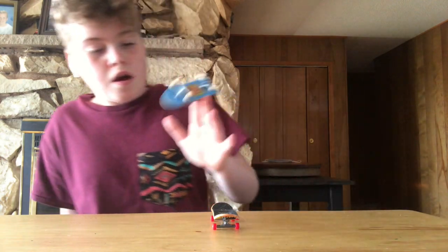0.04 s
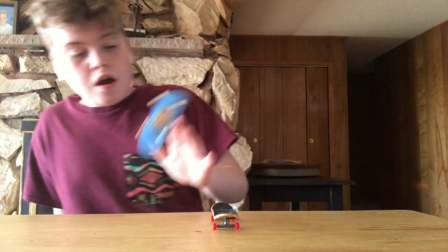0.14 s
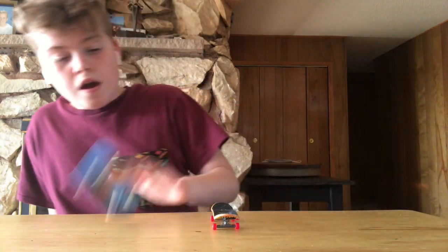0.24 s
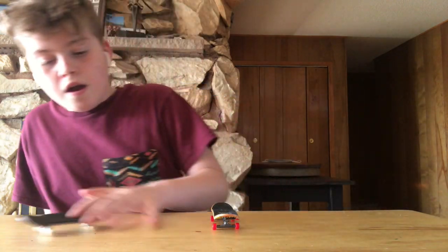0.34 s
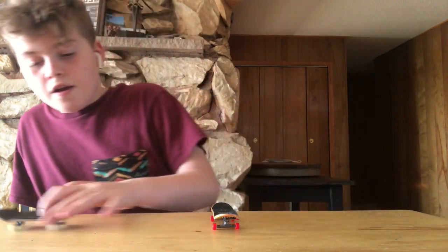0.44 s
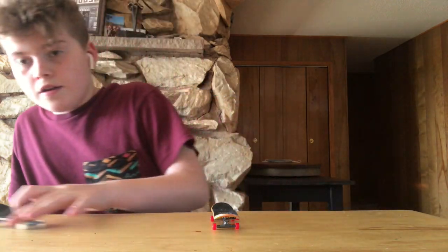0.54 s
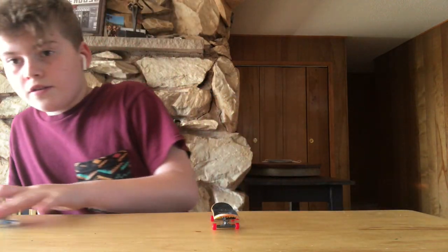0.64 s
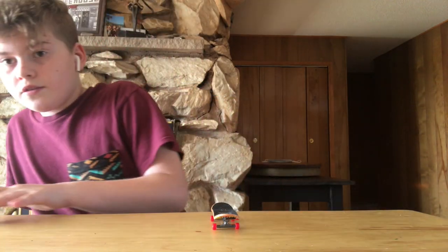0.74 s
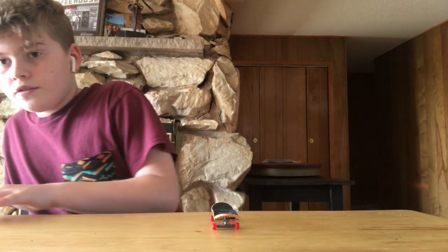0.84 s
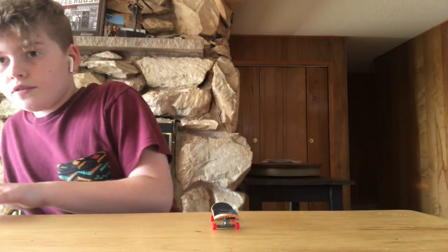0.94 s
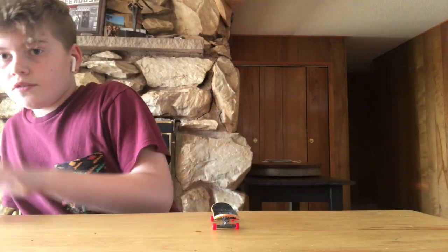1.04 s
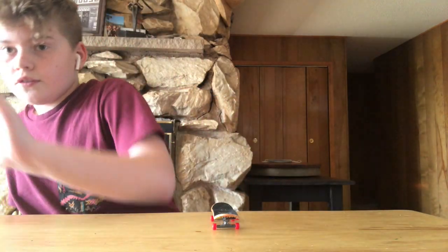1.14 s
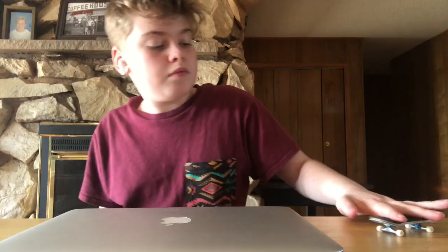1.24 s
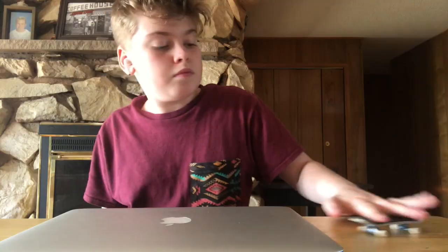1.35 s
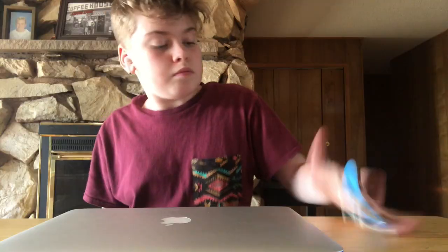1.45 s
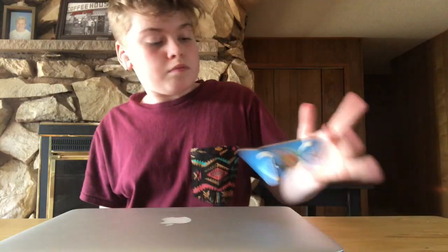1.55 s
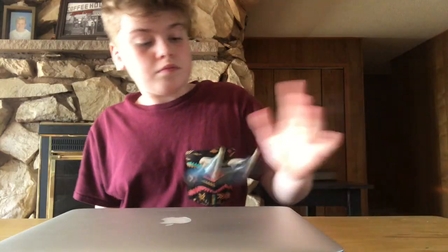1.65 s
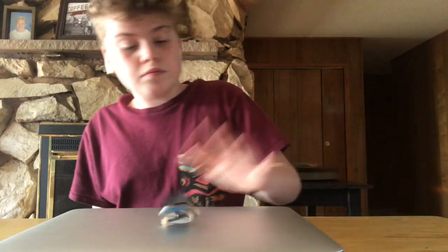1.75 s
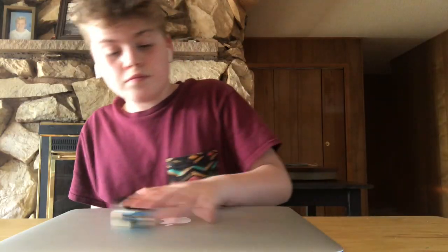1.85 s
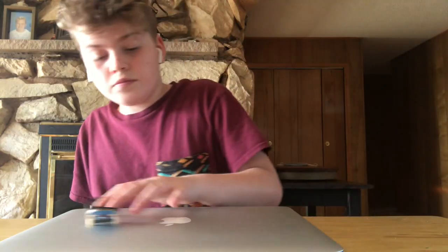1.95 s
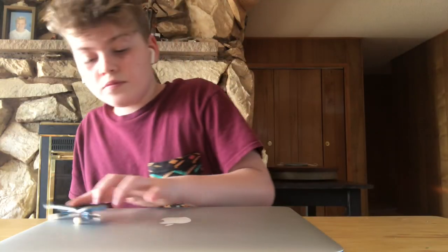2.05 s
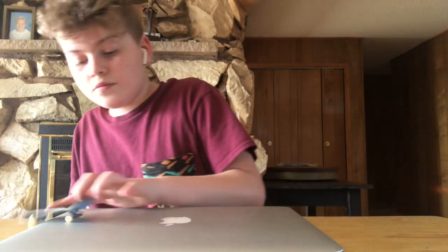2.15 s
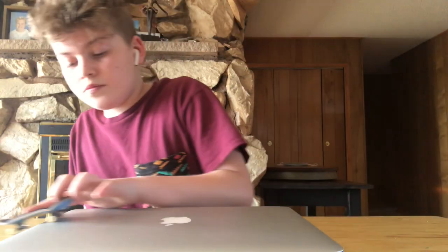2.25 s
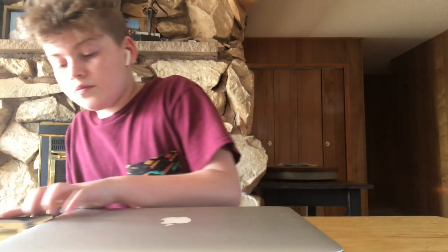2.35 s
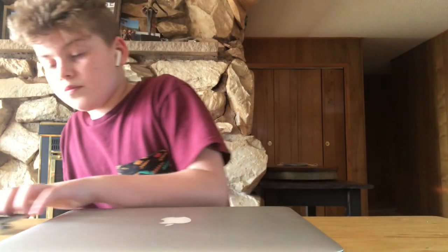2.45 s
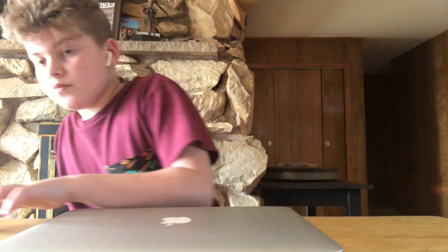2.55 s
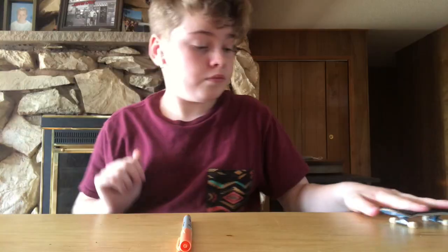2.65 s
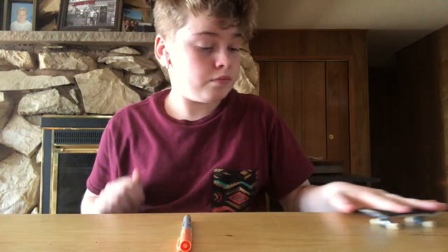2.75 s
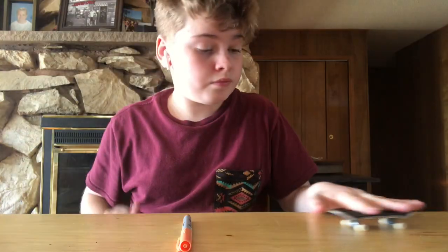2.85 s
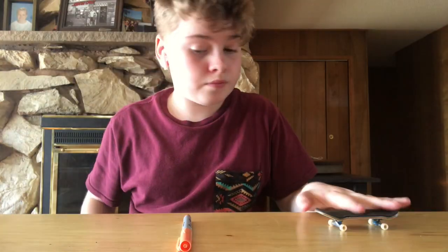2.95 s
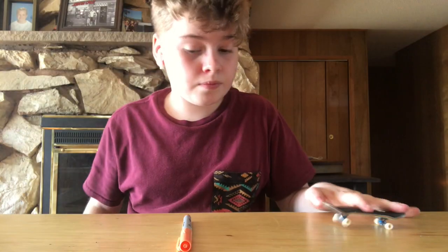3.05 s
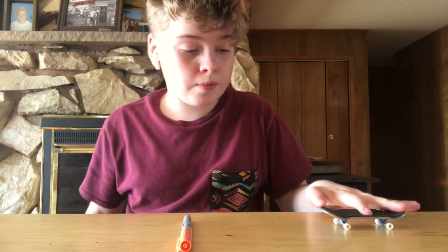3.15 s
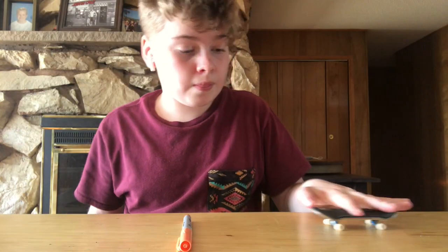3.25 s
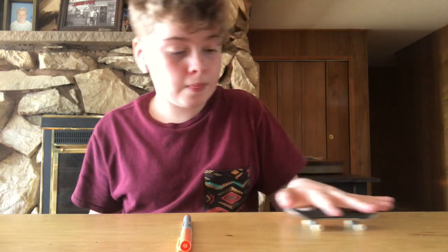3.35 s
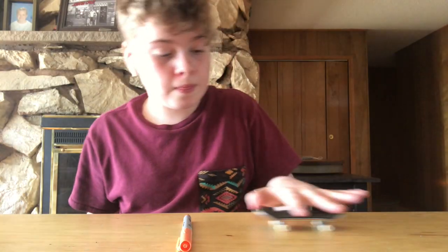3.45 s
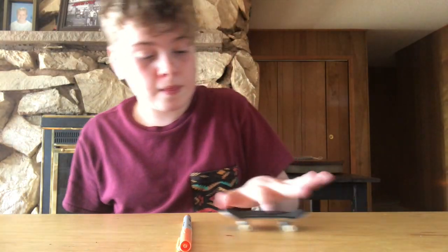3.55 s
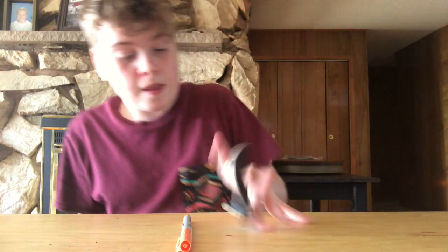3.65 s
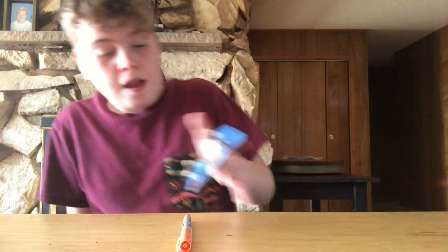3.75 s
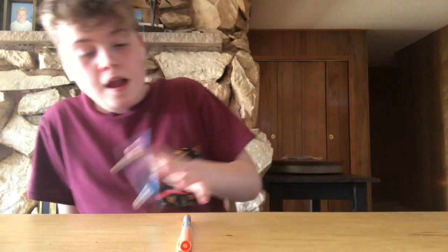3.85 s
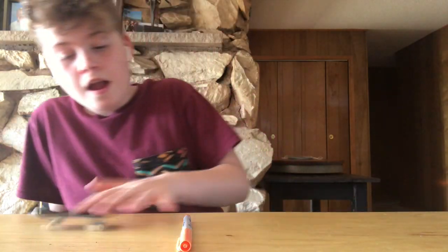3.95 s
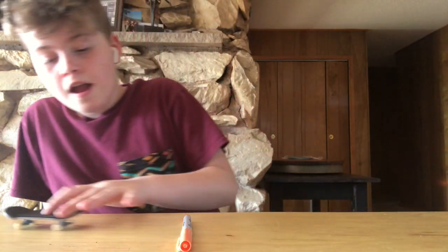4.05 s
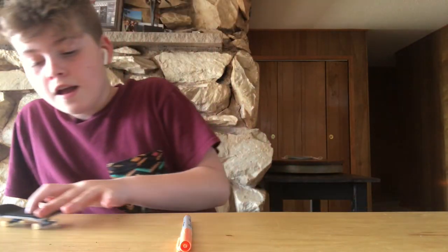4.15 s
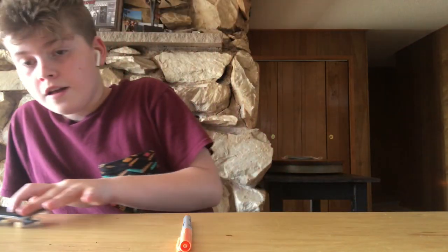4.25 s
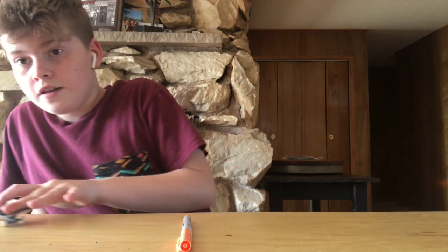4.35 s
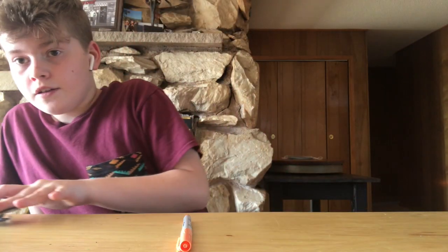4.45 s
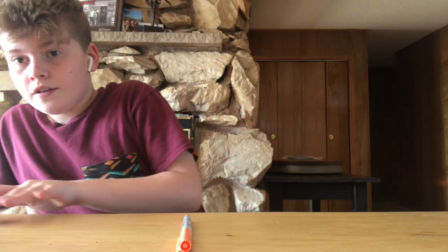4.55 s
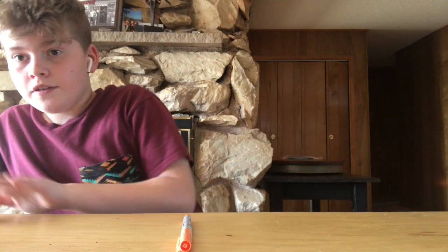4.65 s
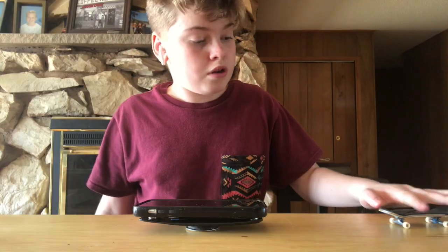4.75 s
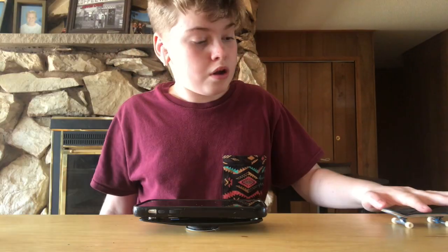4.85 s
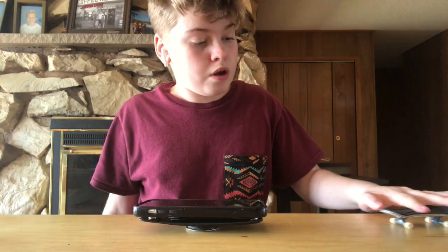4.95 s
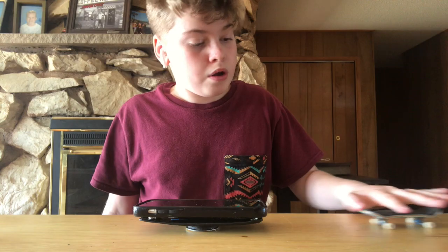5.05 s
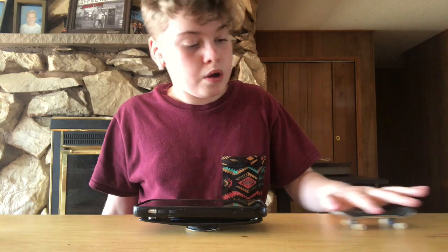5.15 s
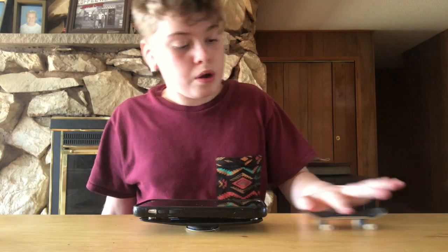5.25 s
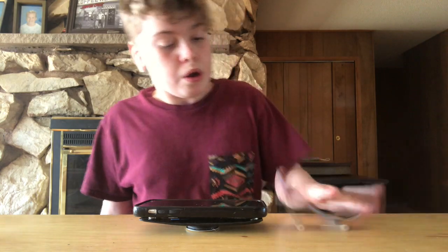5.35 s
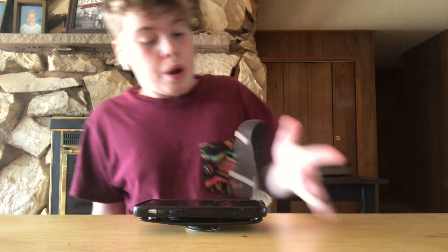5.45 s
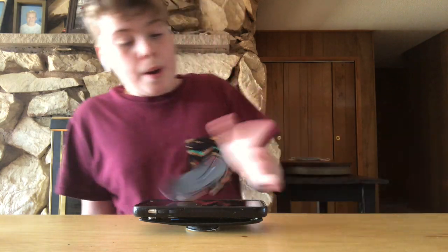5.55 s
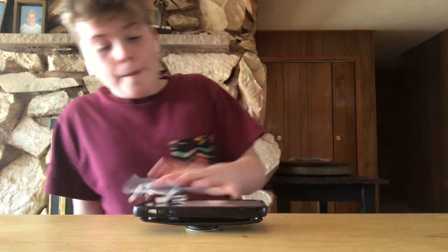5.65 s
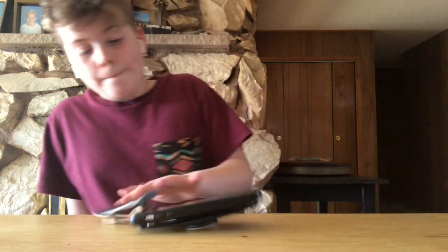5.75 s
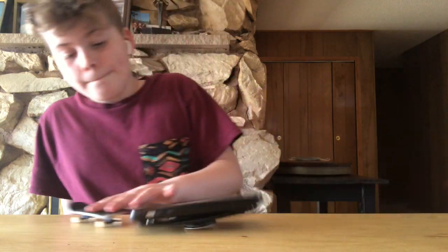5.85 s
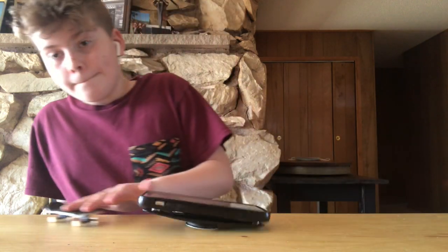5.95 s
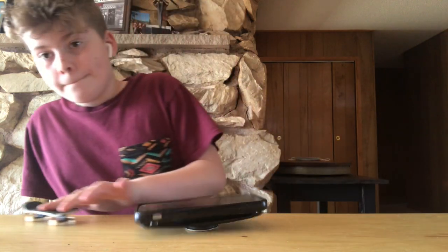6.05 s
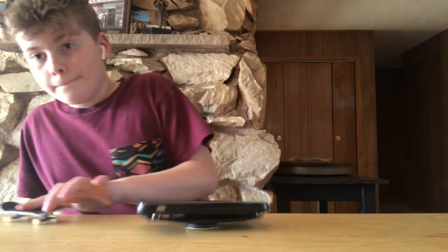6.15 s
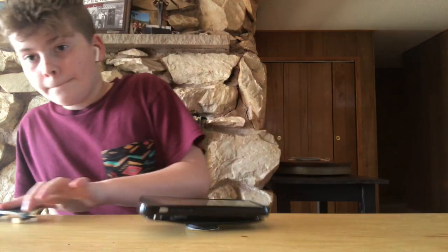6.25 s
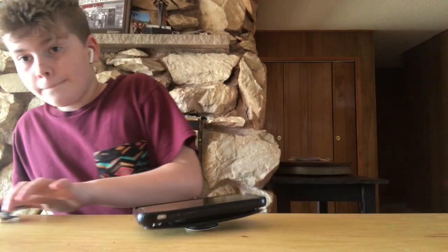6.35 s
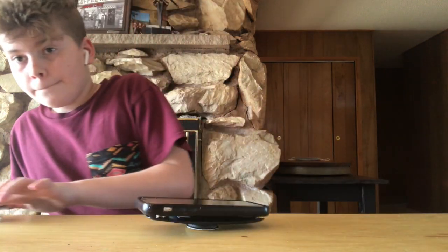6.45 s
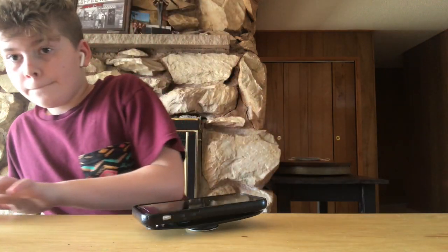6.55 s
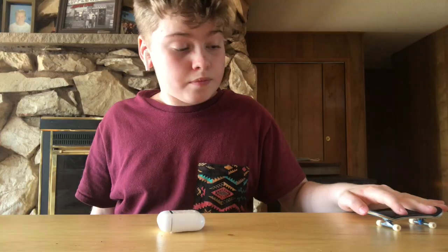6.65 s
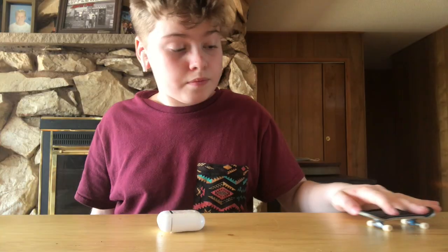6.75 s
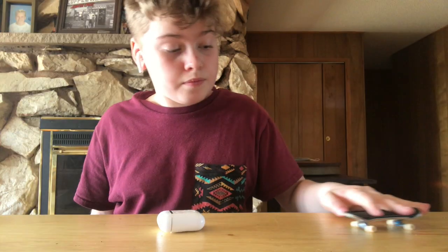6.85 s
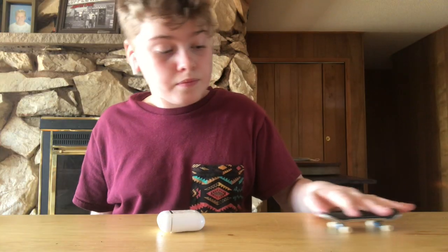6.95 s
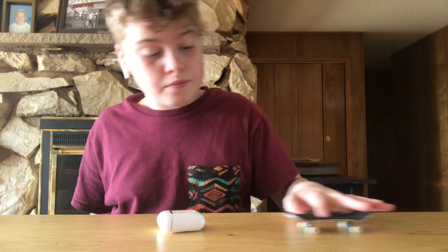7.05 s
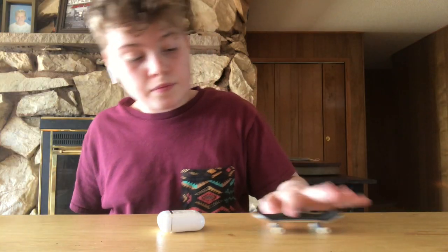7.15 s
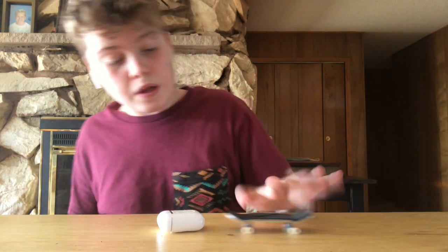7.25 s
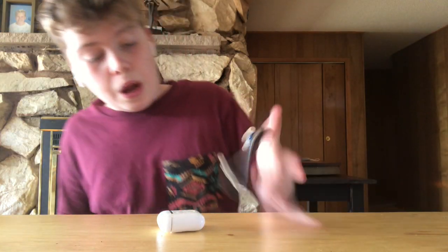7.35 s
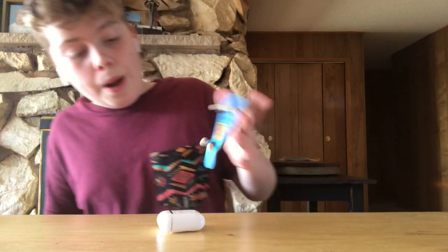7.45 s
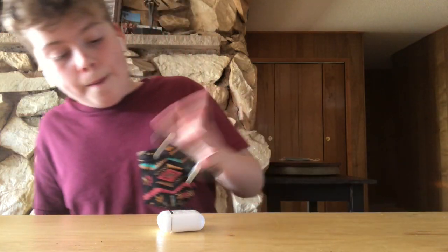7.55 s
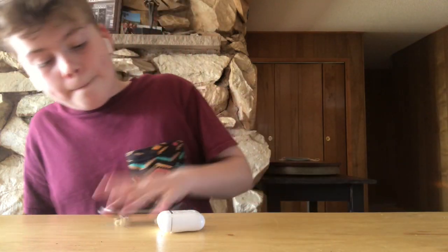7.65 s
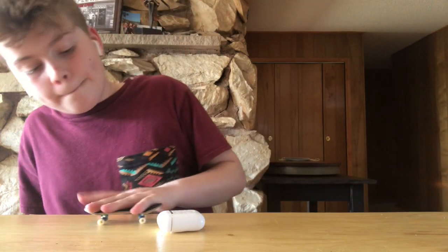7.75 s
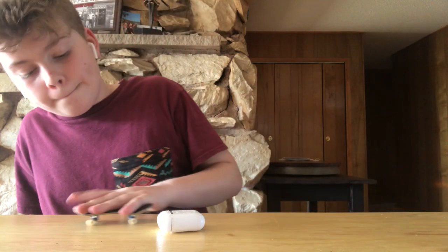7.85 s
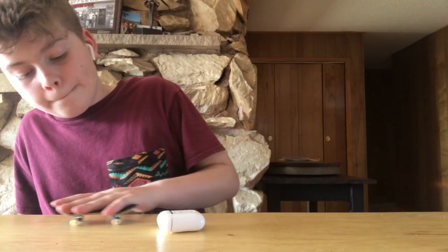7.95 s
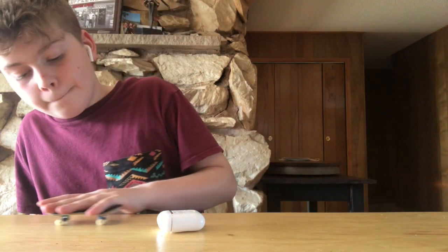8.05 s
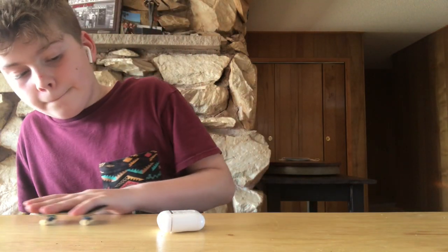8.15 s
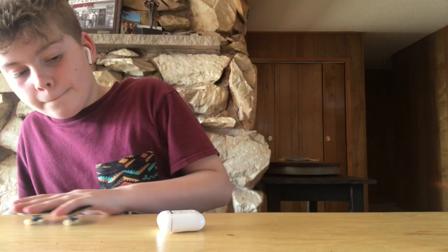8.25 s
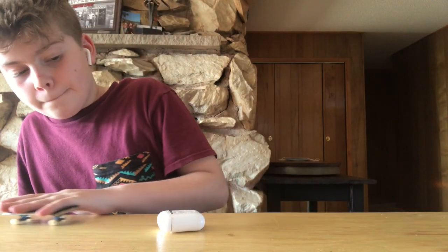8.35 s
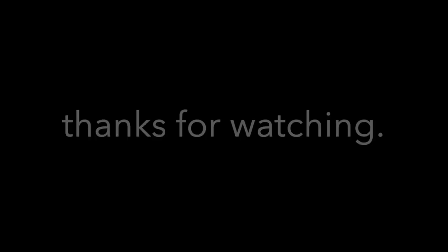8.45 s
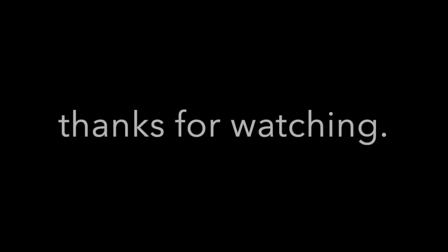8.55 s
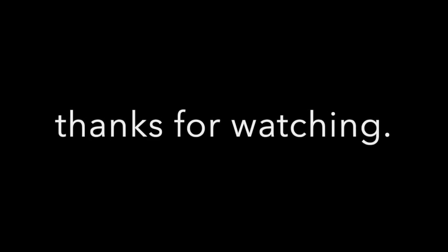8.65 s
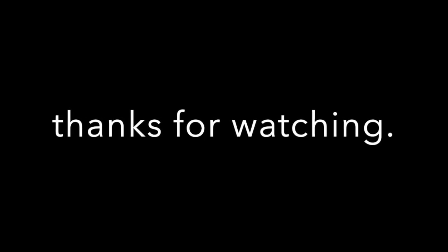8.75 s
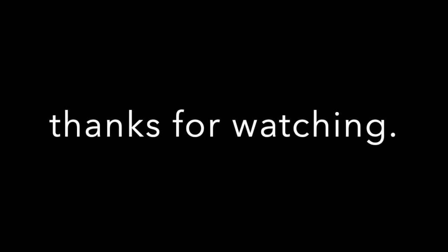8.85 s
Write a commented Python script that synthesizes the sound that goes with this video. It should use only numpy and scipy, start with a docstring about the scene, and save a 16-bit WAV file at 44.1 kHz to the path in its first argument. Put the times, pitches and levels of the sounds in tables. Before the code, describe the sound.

A miniature skateboard is rolled and flipped by fingers on a wooden table, heard from nearby with a short room echo. A faint, pulsing appliance hum and low rumble lie underneath, shifting slightly between five short takes. At about 0.3 seconds the board lands with a loud double clack and rolls away with a soft, grainy whirr. It pops at 1.4, clatters down around 1.7 to 1.8, then rolls on with clicks at 2.2 and 2.3. Light rolling and ticks lead to a pop at 3.6 and a sharp landing at 3.9. After more rolling, a pop at 5.4 is followed by a string of rattling knocks from 5.6 to 5.8 and a fading roll. The last trick snaps at 7.3 and lands loudly at 7.7, with the wheels rolling off quietly. Everything cuts to silence at about 8.4 seconds.

```python
"""A beating motor hum and low room rumble, then a miniature skateboard on a wooden table. Two fingers roll, pop
and land it over small obstacles: five short scenes, then silence. Rolling is noise from wood grain and grit.
Each contact is a few milliseconds of chatter that rings table, deck, wheels and trucks; the blows near 1.7-1.8
s and 5.56-5.66 s are a laptop lid and a phone being struck, voiced with the same sets of modes. Both echo in
the room."""
import sys
import numpy as np
from scipy import signal
from scipy.fft import rfft, irfft
from scipy.io import wavfile

SR = 44100
rng = np.random.default_rng(int(sys.argv[2]) if len(sys.argv) > 2 else 0)


def log_audio(samples):
    """Write samples as a 16-bit WAV file to the path given in sys.argv[1]."""
    # one column per channel
    frames = np.atleast_2d(samples).T
    # limit to full scale, then quantise
    limited = np.clip(frames, -1, 1)
    pcm = np.round(limited * 32767).astype(np.int16)
    wavfile.write(sys.argv[1], SR, pcm)


N = 392483

# Scenes: start_s, hum_beat_minimum_s
SCENE_TIMES = [(0, .62), (1.248, 1.74), (2.654, 3.08), (4.789, 5.97), (6.625, 7.87)]


def amp(db):
    return 10 ** (np.asarray(db) / 20)


def unit_rms(x):
    return x / np.sqrt(np.mean(x ** 2) + 1e-20)


def curve_at(points, hz):
    """Interpolate (freq_hz, value) points over log frequency."""
    freq_hz, value = np.transpose(points)
    return np.interp(np.log(hz + 1), np.log(freq_hz + 1), value)


def shaped_noise(spectrum):
    """Unit-rms noise from (freq_hz, density_db) points."""
    gain = amp(curve_at(spectrum, np.fft.rfftfreq(N, 1 / SR)))
    return unit_rms(irfft(rfft(rng.standard_normal(N)) * gain, N))


def resonate(x, peaks):
    """Steep-skirted resonances, summed in power; unit-rms output."""
    freq_hz = np.fft.rfftfreq(N, 1 / SR)
    power = sum(amp(db) ** 2 / (1 + (2 * (freq_hz - hz) / width_hz) ** 4) for hz, width_hz, db in peaks)
    return unit_rms(irfft(rfft(x) * np.sqrt(power), N))


def wander(rate_hz):
    """Slow random curve, rms about 1."""
    steps = rng.standard_normal(1000)
    return np.interp(np.arange(N) / SR * rate_hz, np.arange(1000), steps) * np.sqrt(3 / 2)


def motor_hum():
    """Two appliance motors, close in pitch, beat against each other."""
    upper_hz, lower_hz = 60, 54.4
    # Motor partials: harmonic, level_db
    upper_partials = [(1, 0), (2, -10.5), (3, -15.5)]
    lower_partials = [(1, -8.5), (2, -14), (3, -15), (4, -19.5)]
    t = np.arange(N) / SR
    start_s, minimum_s = np.transpose(SCENE_TIMES)
    since_s = t - minimum_s[np.searchsorted(start_s, t, "right") - 1]
    upper = sum(amp(db) * np.sin(2 * np.pi * k * upper_hz * since_s) for k, db in upper_partials)
    lower = sum(amp(db) * np.sin(2 * np.pi * k * lower_hz * since_s) for k, db in lower_partials)
    return unit_rms(upper - lower)


def room_tone():
    """Hum over resonant low rumble and faint hiss."""
    # Layer gains: time_s, hum_db, rumble_db, hiss_db
    gains = [(0, -60.5, -68, -75), (1.25, -61, -67.5, -75), (1.26, -59.5, -63.5, -73.5),
             (2.649, -61.5, -68.5, -74), (2.66, -52.5, -58, -70), (3.3, -58, -60, -81.5),
             (3.7, -57.5, -67, -73.5), (4.78, -70.5, -64, -76), (4.8, -61, -66, -74.5),
             (6.62, -56.5, -67.5, -74), (6.64, -59, -65, -75.5), (8.45, -60.5, -70, -76.5)]
    # Rumble spectrum: freq_hz, density_db
    rumble_spectrum = [(39, -32), (66, -8.5), (108, -11), (188, -9.5), (328, -14.5), (400, -16),
                       (480, -33.5), (620, -70), (1060, -120)]
    # Rumble resonances: centre_hz, width_hz, level_db
    rumble_peaks = [(125, 15, -5), (165.3, 14, -6.5), (186.2, 2.8, -14), (235, 4.7, -14)]
    # Hiss spectrum: freq_hz, density_db
    hiss_spectrum = [(260, -26.5), (450, 1), (810, -1.5), (1090, -2.5), (1600, -7.5), (2830, -9),
                     (3660, -7.5), (12800, -17), (15500, -14.5), (16500, -25.5)]
    t = np.arange(N) / SR
    time_s, *gains_db = np.transpose(gains)
    rumble = shaped_noise(rumble_spectrum) + amp(-1) * resonate(rng.standard_normal(N), rumble_peaks)
    layers = motor_hum(), rumble, shaped_noise(hiss_spectrum)
    return sum(amp(np.interp(t, time_s, db)) * layer for db, layer in zip(gains_db, layers))


def rolling():
    """Wood grain and specks of grit shake deck, table, wheels and trucks."""
    # Rolling levels, one curve per scene, rel = against the deck:
    # time_s, deck_db, upper_deck_rel_db, table_rel_db, wheels_rel_db, trucks_rel_db
    curves = [
        [(0, -79, -8, -4, 3, -7), (0.25, -88, -6.5, 0, -1, -5.5), (0.33, -50.5, -2.5, -8.5, -4, -16),
         (0.56, -61, -4, -5, -5.5, -24), (0.73, -61.5, -4.5, -4.5, -11, -32), (0.97, -83, -1.5, 3, -1, -7.5),
         (1.245, -86.5, -3, -0.5, -3.5, -2)],
        [(1.258, -53.5, -10, -11, -4, -13.5), (1.39, -66, -1.5, 3, -3, -18.5),
         (1.55, -64, -11.5, -6.5, -9.5, -7), (1.69, -84, -2.5, -4, -1.5, -5.5), (1.82, -56.5, -6, -13, 1, -7.5),
         (1.99, -57.5, -5.5, -9, -9.5, -16.5), (2.15, -70, -2, 2, -7, -14), (2.2, -57, -7, -9, -7, -18),
         (2.255, -67, -18, -4, -12, -21), (2.31, -56.5, -3.5, -11, -11, -15), (2.42, -61.5, 0, -1.5, -6, -17),
         (2.648, -72.5, -1.5, 5, -6, -16)],
        [(2.66, -64.5, -2.5, 1.5, 3, -0.5), (2.75, -58, 0, 7, -7, -15), (2.775, -51.5, -5.5, -4.5, -5.5, -4.5),
         (2.84, -52.5, -5, -1, -9.5, -15), (2.96, -70.5, -5.5, -0.5, -7.5, -10.5), (3.1, -71, -5, 2, -3, -4.5),
         (3.14, -71, -3, -1.5, -1.5, 5), (3.24, -69.5, -2, 7.5, -4.5, -2.5), (3.35, -61, -6, 4, 0, -8),
         (3.39, -66, -2, -7, -16, -24), (3.44, -60.5, -3.5, -2, -6.5, -13), (3.58, -66, -3.5, -0.5, -1, -14),
         (3.74, -63.5, -14, -7, 0.5, -6.5), (3.88, -79, -14, -3, -1.5, -11.5),
         (3.97, -53.5, -1.5, -10, -5.5, -20), (4.24, -66, -4.5, -5, -9.5, -20.5),
         (4.48, -83.5, -0.5, 11.5, -13, -11), (4.59, -73, -0.5, 1, -3, -8.5), (4.78, -82, -0.5, 4, -1, -2)],
        [(4.8, -100.5, -3, 9, 2.5, 5), (4.97, -74, -0.5, -4, -13, -23.5), (5.13, -60, -1.5, -3, -14, -28),
         (5.25, -61, -3, -4, -9, -22.5), (5.34, -64, -3.5, -8, -2.5, -11), (5.46, -62, -16, -3, -2, -4),
         (5.555, -69, -15, -11, 4, -9), (5.9, -60, -2, -5.5, -2.5, -18), (6.03, -63.5, -5, 0.5, -8.5, -25),
         (6.29, -70.5, -3, 3.5, -10.5, -23.5), (6.55, -75, 1.5, 8.5, -17.5, -23.5),
         (6.615, -74, 8, 8, -7.5, -20)],
        [(6.635, -93, -6, 4.5, 2, 0), (6.76, -77, 5, 2.5, -4, -17), (7.05, -61.5, -2.5, -1, -8, -29),
         (7.15, -62, -4.5, -1.5, -7.5, -20), (7.28, -65, -4.5, 0.5, -3, -15), (7.44, -65.5, -7.5, -3, 2, -9),
         (7.63, -82, -3.5, -3, 2, -7), (7.72, -57, -7.5, -19, -5.5, -9.5), (7.82, -61, -5.5, -20, -2, -17.5),
         (8.12, -79, -0.5, 6, -10, -15), (8.24, -72.5, -4, -5, -13, -20), (8.32, -76.5, -4, 2, -8, -11),
         (8.41, -72.5, -14, -8, -16, -20)],
    ]
    # Resonances of each part: centre_hz, width_hz, level_db
    deck = [(1550, 300, 0.5), (1700, 51, 2), (1850, 250, -1), (2025, 260, -0.5)]
    upper_deck = [(2302, 260, 4), (2703, 620, 2.5), (3300, 650, -1.5)]  # the deck's brighter resonances
    table = [(537, 340, -1.5), (737, 280, 0.5), (912, 480, -1.5)]
    wheels = [(3670, 3200, 8), (4820, 3400, -4.5), (6020, 5400, -11)]
    trucks = [(7540, 2400, 1), (8900, 1300, 0.5), (12500, 6900, -8.5)]
    grain_db, waver_db, grit_per_s = 1.2, 1.2, 120
    parts = deck, upper_deck, table, wheels, trucks
    t = np.arange(N) / SR
    time_s, deck_db, *parts_rel_db = np.concatenate(curves).T
    grain = amp(grain_db * wander(rate_hz=50))
    grit = 4 * rng.standard_normal(N) * (rng.random(N) < grit_per_s / SR)
    out = np.zeros(N)
    for rel_db, peaks in zip((np.zeros_like(time_s), *parts_rel_db), parts):
        level_db = np.interp(t, time_s, rel_db) + waver_db * wander(rate_hz=25)
        out += amp(level_db) * resonate(grain * rng.standard_normal(N) + grit, peaks)
    return amp(np.interp(t, time_s, deck_db)) * out


def ring(modes, favoured_hz, scatter_db, damping):
    """Decaying sines; the strike point favours modes near certain pitches."""
    hz, db, t60_s = np.transpose(modes)[:, :, None]
    boost_db = sum(27.3 * np.exp(-(np.log(hz / pitch_hz) / 0.036) ** 2) for pitch_hz in favoured_hz)
    db = db + scatter_db[:len(modes), None] + boost_db
    t = np.arange(int(t60_s.max() * SR) + 200) / SR
    sound = (amp(db - 60 * damping * t / t60_s) * np.sin(2 * np.pi * hz * t)).sum(0)
    radiated_hz = [0.98 * hz.min(), min(2.21 * hz.max(), SR / 2.2)]
    return signal.sosfilt(signal.butter(5, radiated_hz, "band", fs=SR, output="sos"), sound)


def contacts():
    """Bursts of tiny impacts ring each part. Returns direct sound and room send."""
    # Blows, rel = against the deck: start_s, deck_peak_db, thud_rel_db, knock_rel_db, wheels_rel_db,
    # trucks_rel_db, favoured_table_hz, favoured_deck_hz, favoured_wheels_or_trucks_hz
    blows = [(0.2664, -16.5, -14.5, -14, -7.5, -14, 1282, 1810, 3680),
             (0.2923, -12, -15, -14, -1, -8, 349.6, 2763, 3560),
             (0.3001, -30.5, -8, -7, -2, -3, 365, 2800, 4100),
             (0.3099, -28.5, -5.5, -8.5, -12, -11, 121, 2740, 4100),
             (0.7802, -50.5, -10, -18, -12, -29.5, 840, 1930, 4270),
             (0.9999, -46, -9.5, -11.5, -5, -17, 280, 2740, 3810),
             (1.4131, -28, -8.5, -10, -7.5, -2.5, 354, 2600, 12570),
             (1.4231, -36.5, -4.5, -3, 5, -8, 103, 2080, 3370),
             (1.4419, -25.5, -8, -13, 3.5, 0.5, 357, 3020, 5260),
             (1.7046, -23.5, -15, -8.5, -7, 5.5, 1260, 1683, 15400),
             (1.7195, -20.5, -38, -11, -3.5, -3, 1240, 2410, 12200),
             (1.7356, -37, -27, -4, 2, 7, 1270, 1480, 6440),
             (1.7914, -20, -14, -6, -10, 0.5, 1236, 1440, 12360),
             (1.7952, -24, -11.5, -1, -0.5, 4, 263.5, 1486, 14640),
             (1.872, -44, -14, -14, -3, -18, 274, 1660, 3930),
             (2.162, -25, -22, -21, -4, -2.5, 345, 1630, 9720),
             (2.3208, -26, -23.5, -13, 1, 1.5, 654, 1697, 4306),
             (2.3308, -32, -9, -11, -15, -17, 204, 1470, 3770),
             (2.7704, -38, -38, -31, 5.5, -3, 660, 1530, 3480),
             (3.1048, -45, -20, -18.5, 13.5, 13, 800, 2990, 4680),
             (3.1082, -34.5, -11, -8, 12.5, 18, 753, 1674, 9010),
             (3.127, -54.5, -16, -10.5, 0, 12, 760, 1674, 8700),
             (3.3249, -47.5, -23, 1, -4, 1, 770, 1530, 7240),
             (3.3559, -53.5, -21, 4, 7, 4, 690, 1760, 9200), (3.3626, -53, -11, -8, 2, -2, 680, 1770, 8700),
             (3.4422, -42, -12, -27, -9, -15, 98, 2020, 13200),
             (3.447, -52, -10, -6.5, 1, -9, 120, 1710, 5200),
             (3.5907, -32, -2, -4.5, -1, 0, 264, 1700, 3840),
             (3.6081, -36, -25, -8.5, -11, 6, 744, 2780, 12000),
             (3.6161, -26.5, -30, -11.5, 2, 2, 345, 1640, 3370),
             (3.6239, -42.5, 12, -14, 7.5, -5, 229.4, 1750, 6470),
             (3.6334, -42.5, -15, -14, 7, 10, 244, 1710, 12300),
             (3.8876, -30.5, -28, -14, -1, -35, 655, 1850, 5000),
             (3.8957, -40.5, -13, -20.5, -3, 3, 98.4, 1700, 7320),
             (3.9009, -33, -4.5, -11, 1, 4.5, 199, 1820, 8940),
             (3.915, -15.5, -14, -14.5, -6, -3.5, 745, 2013, 4280),
             (3.9335, -19.5, -38, -13, -6.5, -2, 1310, 1485, 7240),
             (3.9414, -28.5, -8, -35, -9, -2, 205, 1610, 3870),
             (3.9514, -26.5, -22, -26, -4, -20, 690, 2800, 3980),
             (5.2857, -46, -13, -35, -5, -21, 160, 2780, 3400),
             (5.3518, -26, -12, -7.5, -12, -13, 1056, 1620, 5300),
             (5.3695, -38.5, -16, 0, 0, 5, 835, 2370, 14900),
             (5.3776, -22.5, -10.5, -42, 0, -5.5, 355, 2920, 5230),
             (5.5652, -36.5, -29, 1, -12, -5, 660, 1880, 13100),
             (5.5926, -35, -14, -8, -9, 4, 550, 2260, 14900),
             (5.601, -36, -30, -1.5, 5, -5, 570, 1810, 3480),
             (5.61, -43.5, -29, -29, 8.5, 7, 557, 1620, 4000),
             (5.6637, -35, -25.5, -1.5, 0, 0, 1092, 2380, 6070),
             (5.7233, -18, -19, -27.5, -6.5, -6, 204, 2160, 7350),
             (5.7422, -37, -6, -21, -12, -20, 242, 2290, 4020),
             (5.7944, -41, 2.5, -10, -13, -10, 208, 1960, 3680),
             (5.8042, -28, -15, -24, -1.5, -0.5, 245.5, 1960, 6100),
             (5.8097, -25.5, -39, -34.5, -8, -4, 1240, 2270, 3940),
             (5.8246, -28, -35, -22, -6, -25, 98, 1750, 3980),
             (7.0135, -43, -12, -25.5, -15, -16, 120, 2170, 3900),
             (7.2872, -19.5, -13, -13, -22.5, -9, 1250, 2450, 15100),
             (7.2951, -31.5, -8, -1.5, -12, -16, 1060, 2600, 6300),
             (7.3052, -29.5, -20.5, -17.5, -15, -13, 683, 2000, 3800),
             (7.3092, -18.5, -9, -20, -1.5, -5, 362, 2950, 5210),
             (7.329, -48, -9, -12.5, 14, -10, 270, 1720, 6270),
             (7.643, -24.5, -27, -30.5, -4, -8, 1250, 1820, 5800),
             (7.6512, -35.5, -9.5, -29.5, -4, 5, 164, 1660, 8800),
             (7.6556, -17.5, -33, -32, -9, -2.5, 1280, 2790, 8540),
             (7.6585, -13.5, -26, -21, -4.5, -7.5, 676, 2330, 4430),
             (7.668, -35, -4.5, -20.5, -10, -10, 121, 1700, 3950),
             (7.6742, -24.5, -40, -27, 2, -16, 1260, 2390, 4450),
             (7.6817, -15.5, -20, -30, -5.5, -10, 204, 1990, 12300),
             (7.6999, -40.5, -13, -26, -1, -16, 99, 1990, 3830),
             (7.895, -46, -9, -21, -25, -8, 121, 2010, 7040)]
    # Modes of table (thud, knock) and board: pitch_hz, level_db, nominal_t60_s
    thud = [(106, -10.5, 0.13), (120, -11, 0.033), (163, -6.5, 0.028), (204, -8.5, 0.031),
            (251.4, 0.5, 0.13), (280, 2, 0.09), (339, 7, .07), (378.4, 2.5, 0.11)]
    knock = [(537, -5, 0.027), (656, 8, 0.013), (743.7, 1, 0.039), (845, -1, 0.016), (1058, -1, 0.023),
             (1245, -12, 0.046)]
    wheels = [(3430, -6, 0.0047), (3910, -15, 0.0092), (4115, -6.5, 0.024), (4510, -4.5, 0.0087),
              (4970, 4, 0.0047), (5394, -1.5, 0.0088), (5930, -5.5, 0.0084), (6580, -3, 0.0063)]
    trucks = [(7200, -8, 0.005), (8790, -8, 0.01), (9350, 6.5, 0.0027), (10980, 2, 0.0064),
              (12000, 8.5, .003), (12700, 1.5, 0.0054), (14000, -11.5, .003), (15200, 3, 0.0018)]
    deck = [(1534, -8.5, 0.025), (1630, 3.5, 0.011), (1801, -2, 0.006), (1944, -1.5, 0.015),
            (2216, 2, 0.0062), (2334, -2, 0.01), (2704, 0.5, 0.012), (3015, -5.5, 0.013)]
    chatter_ms, thud_lag_s, send_db = 2.09, 0.002, -6.5
    parts = thud, knock, wheels, trucks, deck
    progress = np.arange(400) / SR * 1000 / chatter_ms
    push = progress ** 2 * np.exp(-4.5 * progress)
    chatters = rng.standard_normal((len(blows), len(push)))
    scatters_db = 2 * rng.standard_normal((len(blows), len(parts), len(deck)))
    direct, send = np.zeros(N), np.zeros(N)
    for (start_s, deck_db, *columns), chatter, blow_scatter_db in zip(blows, chatters, scatters_db):
        parts_rel_db, favoured_hz = (*columns[:4], 0), columns[4:]
        for modes, rel_db, scatter_db in zip(parts, parts_rel_db, blow_scatter_db):
            # The heavy table's low modes feel only the whole push, and sound late.
            force, lag_s = (push, thud_lag_s) if modes is thud else (push * chatter * abs(chatter), 0)
            sound = signal.fftconvolve(force, ring(modes, favoured_hz, scatter_db, damping=0.9))
            sound *= amp(deck_db + rel_db) / abs(sound).max()
            add(direct, start_s + lag_s, sound)
            # The walls hear the blow from every side, which blurs its modes.
            blurred = ring(modes, favoured_hz, scatter_db, damping=1.7)
            add(send, start_s, amp(send_db) * blurred * np.linalg.norm(sound) / np.linalg.norm(blurred))
    return direct, send


def add(mix, start_s, sound):
    span = mix[round(start_s * SR):][:len(sound)]
    span += sound[:len(span)]


def room_echo(send):
    """Three sparse tails take turns, so blows echo differently; each band has its own decay."""
    # Room decay: freq_hz, t60_s
    decay = [(120, 0.38), (330, 0.6), (870, 0.52), (2300, 0.33), (6000, 0.4), (12000, 0.27)]
    # Echo colour: freq_hz, gain_db
    colour = [(100, -1.5), (400, -4), (1000, -2), (2000, -1), (4000, 0), (8000, -0.5), (15000, 4.5)]
    turn_hz, slot_samples = 7, 20
    out, t = np.zeros(N), np.arange(N) / SR
    slots = np.arange(200, SR - slot_samples, slot_samples)
    for k in range(3):
        taps = np.zeros(SR)
        taps[slots + rng.integers(0, slot_samples, len(slots))] = rng.choice([-1., 1.], len(slots))
        hz, age_s, bands = signal.stft(taps, SR, nperseg=256)
        bands *= amp(curve_at(colour, hz)[:, None] - 60 * age_s / curve_at(decay, hz)[:, None])
        tail = signal.istft(bands, SR, nperseg=256)[1]
        turn = np.sqrt(2 / 3) * np.cos(2 * np.pi * (turn_hz * t + k / 3))
        out += signal.fftconvolve(send * turn, tail / np.linalg.norm(tail))[:N]
    return out


def scene():
    """Board, echo and room tone, mono."""
    hits, hit_send = contacts()
    roll = rolling()
    echo = room_echo(hit_send + amp(-12) * roll)
    return (hits + roll + echo + room_tone())[None]


def record(dry):
    """Microphone bass cut, brief dips at scene changes, end fade, band limit."""
    low_cut_hz, band_limit_hz = 50, 16200
    end_s, fade_s, dip_s = 8.445, 0.0054, 0.0059
    t = np.arange(N) / SR
    gain = np.clip((end_s - t) / fade_s, 1e-5, 1)
    for start_s, _ in SCENE_TIMES[1:]:
        gain *= np.clip(abs(t - start_s) / dip_s, 0.15, 1)
    heard = signal.sosfilt(signal.butter(3, low_cut_hz, "high", fs=SR, output="sos"), dry) * gain
    lowpass = signal.firwin(255, band_limit_hz, window=("kaiser", 9), fs=SR)
    return signal.oaconvolve(heard, lowpass[None], "same")


dry = scene()
out = record(dry)
log_audio(out)
```